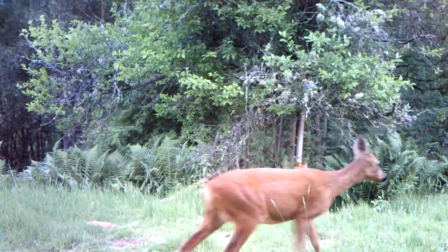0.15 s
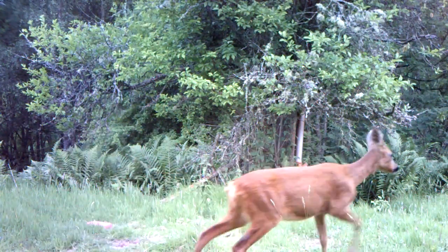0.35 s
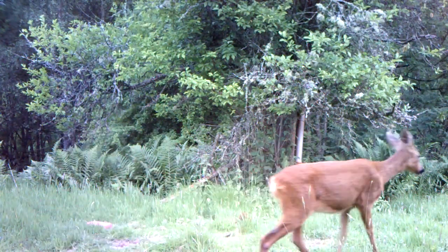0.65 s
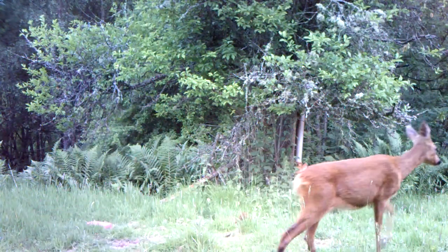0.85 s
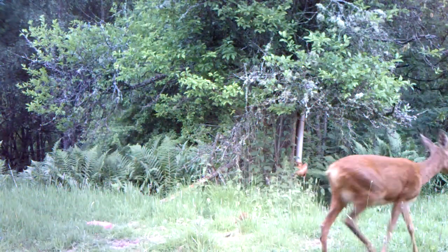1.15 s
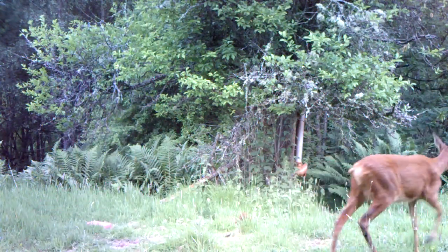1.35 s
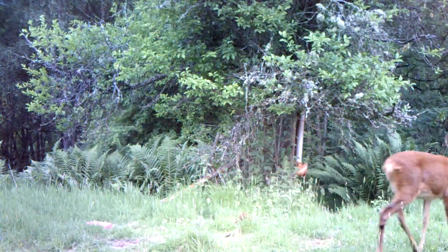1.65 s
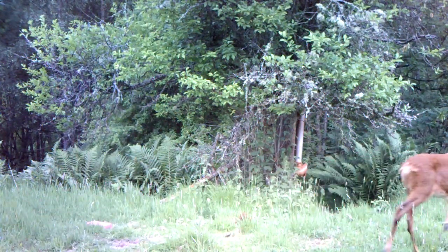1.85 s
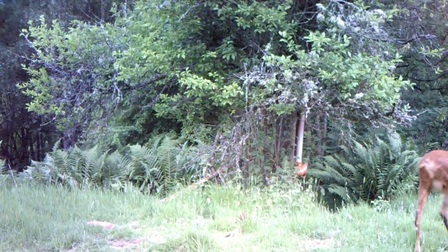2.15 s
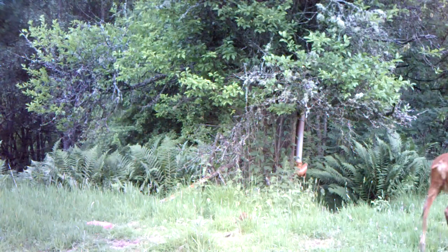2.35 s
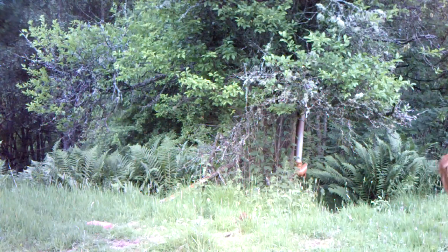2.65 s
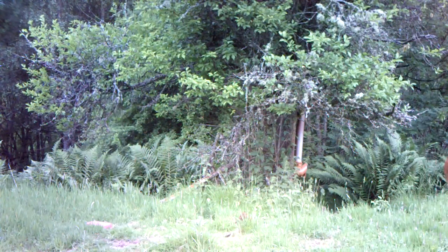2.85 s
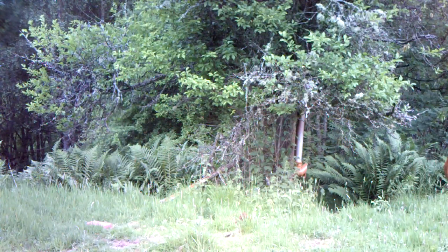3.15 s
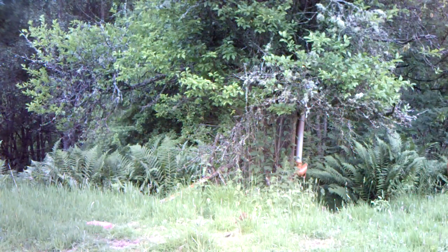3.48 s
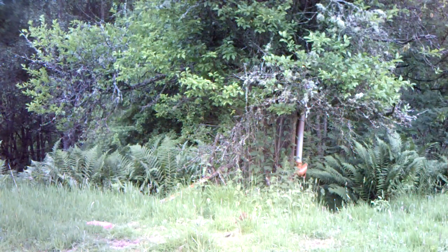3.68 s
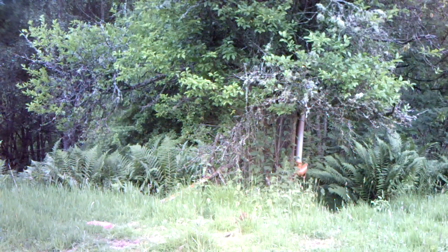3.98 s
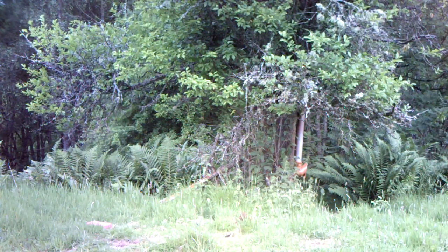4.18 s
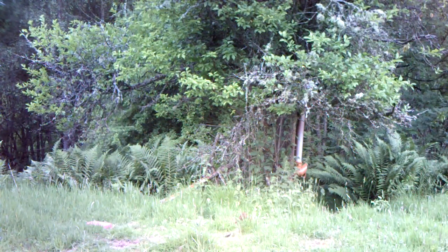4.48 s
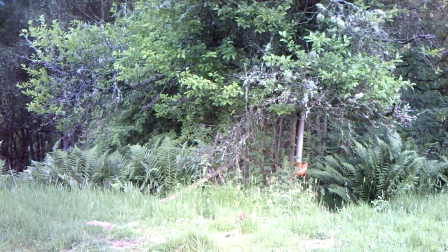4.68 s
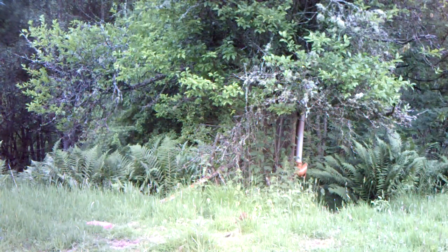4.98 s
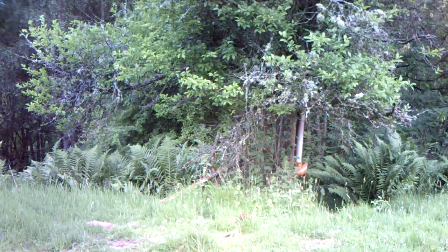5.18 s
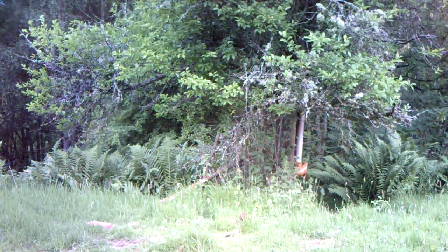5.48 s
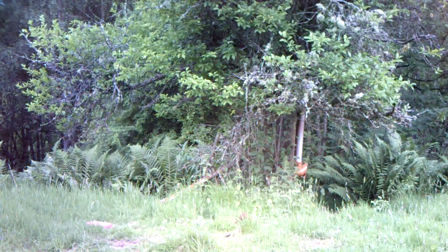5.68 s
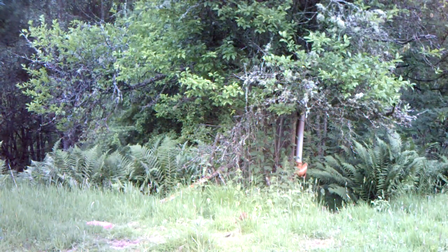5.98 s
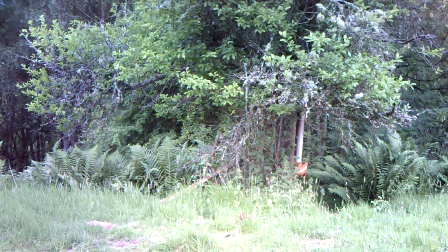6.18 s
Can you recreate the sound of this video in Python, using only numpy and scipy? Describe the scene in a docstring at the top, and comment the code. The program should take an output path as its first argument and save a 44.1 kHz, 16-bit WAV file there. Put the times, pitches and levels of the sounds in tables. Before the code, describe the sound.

In a quiet wood, the last ring of an earlier call fades into a far murmur and soft hiss. A deer steps faintly through grass, with a few twigs ticking and a thin bird whistling far away. Near the end it huffs and barks once, loud and hoarse, fairly close to the microphone. The bark rings briefly among the trees with a slight echo, followed by a faint creaky grunt.

```python
"""Roe deer barking in woodland at dusk

One microphone in a quiet wood. A deer walks through the grass, twigs ticking, over a far murmur,
soft hiss and a thin distant bird; an earlier call is just dying away at the start. Fairly close,
it huffs and barks once, hoarsely, ragged vocal-fold pulses ringing its throat, then gives a faint
creaky grunt. The trunks scatter the bark and ring on, and the clearing's far edge sends an echo."""
import sys
import numpy as np
from scipy import signal
from scipy.io import wavfile
from scipy.ndimage import uniform_filter1d

SR = 44100
rng = np.random.default_rng(int(sys.argv[2]) if len(sys.argv) > 2 else 0)


def inscribe(sig):
    """Save sig as 16-bit PCM at rate SR to the path in sys.argv[1].

    A 1-D sig is mono; a 2-D sig holds one channel per row.
    Samples are clipped to [-1, 1] before scaling.
    """
    pcm = np.round(np.clip(np.atleast_2d(sig).T, -1, 1) * 32767)
    wavfile.write(sys.argv[1], SR, pcm.astype(np.int16))


N = 279099
TIME = np.arange(N) / SR

# spectrum of the wood's background: frequency_hz, gain_db
AIR_COLOUR = [(25, -7.5), (110, -8.5), (260, -12), (400, -7.5), (600, -4), (850, -1.5), (1100, 0.5),
              (1400, -7.5), (1750, -16.5), (2300, -19.5), (3500, -21), (7000, -21), (9500, -23.5),
              (12000, -25.5)]
# spectrum of an earlier call's last ring: frequency_hz, gain_db
EARLIER_COLOUR = [(200, -32), (600, 3.5), (1000, 4), (1400, 7), (2000, -3), (3200, -10.5), (5000, -24),
                  (12000, -47)]
# the deer's strides through the grass, about two a second: peak_s, level_db
STRIDES = [(.07, -69.5), (.35, -69), (.74, -74), (1.22, -71), (1.72, -73), (2.19, -73), (2.73, -72),
           (3.66, -74.5), (4.24, -76), (4.7, -74), (5.0, -73), (5.33, -72), (5.76, -70.5), (6.17, -70.5)]
# spectrum of brushing blades: frequency_hz, gain_db
GRASS_COLOUR = [(500, -11), (2500, -9), (5000, 1.5), (7500, 5), (10500, 2), (13000, -25)]
# twigs and dry stems snapping, level over the first 2 ms: start_s, level_db, low_hz, high_hz
TWIG_SNAPS = [(0.141, -61, 2500, 10000), (0.715, -51.5, 2800, 11100), (1.753, -53.5, 2900, 10000),
              (2.017, -62, 4500, 10000), (2.7138, -50.5, 5900, 12000), (2.731, -57, 6200, 11000),
              (2.798, -65.5, 1970, 2880), (3.089, -65, 2300, 4000), (4.248, -62, 6000, 11000)]
# the bird's notes before the trees scatter them: start_s, length_s, pitch_hz, level_db
BIRD_NOTES = [(1.628, 0.19, 4330, -81), (1.864, 0.099, 4344, -72.5), (2.207, 0.091, 4390, -80),
              (4.125, 0.12, 4430, -74), (4.375, 0.12, 4400, -76)]
# spectrum of the wood's ring: frequency_hz, gain_db
WOOD_COLOUR = [(150, -18), (400, -4), (600, 2), (900, 0), (1400, -2.5), (2000, 1.5), (4000, 10.5),
               (9000, -18)]
# time that ring takes to fall 60 dB: frequency_hz, decay_s
WOOD_T60 = [(150, 0.55), (600, 0.77), (1300, 0.79), (2000, 0.85), (4000, 0.59), (9000, .4)]
# spectrum of the breath that opens the bark: frequency_hz, gain_db
HUFF_COLOUR = [(90, -19), (180, -6), (260, 11.5), (370, 7.5), (600, -4), (1200, -2), (2500, -35),
               (4200, -15), (6000, -27), (7400, -9), (9000, -28), (12000, -43)]
# spectrum of turbulence at the mouth: frequency_hz, gain_db
MOUTH_HISS_COLOUR = [(1500, -22), (3000, 2), (3900, -3.5), (4600, 2), (5800, -11.5), (7300, -5.5),
                     (9000, -19), (12000, -27)]
# broad spectrum of the voice: frequency_hz, gain_db
VOICE_COLOUR = [(110, -64), (210, -19.5), (310, -16.5), (420, -19), (540, -6), (780, -7), (1100, 1.4),
                (1550, -2.5), (2200, -13.5), (3300, -19), (3900, -38), (5500, -37.5), (8000, -44),
                (12000, -67)]
# throat resonances before the mouth shifts them: centre_hz, width_hz, lift_db
THROAT_RESONANCES = [(590, 155, 7.5), (1290, 65, 13), (1930, 29, 13.5), (3310, 140, 4), (4500, 280, -7)]
# hard slaps of the vocal folds within the bark: start_s, peak_db
FOLD_SLAPS = [(5.4882, -20.5), (5.5185, -18), (5.535, -19), (5.5491, -19.5), (5.5604, -20.5), (5.5838, -18),
              (5.6077, -20)]
# spectrum of the grunt: frequency_hz, gain_db
GRUNT_COLOUR = [(100, -21), (300, -11), (700, -20), (1100, -15), (1400, -1.5), (1650, -9), (2050, -28),
                (5000, -37)]


def amp(db):
    return 10 ** (np.asarray(db) / 20)


def unit_rms(x):
    return x / np.sqrt(np.mean(x ** 2) + 1e-20)


def value_at(points, hz):
    """A table's value at hz, interpolated on a log-frequency axis."""
    table_hz, values = np.transpose(points)
    return np.interp(np.log(hz + 1), np.log(table_hz + 1), values)


def add(mix, start_s, sound):
    part = mix[round(start_s * SR):][:len(sound)]
    part += sound[:len(part)]


def wander(t, per_s):
    """A random drift of about unit size, with per_s turning points a second."""
    knots = rng.standard_normal(8192)
    return np.interp((t - t[0]) * per_s, np.arange(len(knots)), knots)


def envelope(t, attack_s, hold_s, release_s, depth_db=40):
    """A rounded rise from depth_db down, a hold, and a rounded fall."""
    rising = np.maximum(1 - t / attack_s, 0)
    falling = np.maximum(t - attack_s - hold_s, 0) / release_s
    return amp(-depth_db * (rising ** 1.45 + falling ** 2))


def colour(x, points):
    """A causal filter with the given spectrum: it rings after a pulse, never before."""
    log_gain = np.log(amp(value_at(points, abs(np.fft.fftfreq(8192, 1 / SR)))))
    taps = np.fft.ifft(np.exp(np.conj(signal.hilbert(log_gain)))).real
    return signal.fftconvolve(x, taps[:len(taps) // 2])[:len(x)]


def resonate(x, hz, width_hz):
    """A resonance of gain 1 centred on hz, which may glide."""
    turn = np.exp(2j * np.pi * np.cumsum(hz * np.ones(len(x))) / SR)
    pole = np.exp(-np.pi * width_hz / SR)
    return 2 * (turn * signal.lfilter([1 - pole], [1, -pole], x / turn)).real


def air(level_db=-60.5, swell_db=0.42, murmur_below_hz=1800):
    """A far murmur that swells a little, under steady hiss."""
    noise = amp(level_db) * unit_rms(colour(rng.standard_normal(N), AIR_COLOUR))
    murmur = signal.sosfiltfilt(signal.butter(2, murmur_below_hz, fs=SR, output="sos"), noise)
    return noise + murmur * (amp(-swell_db * wander(TIME, 5.05)) - 1)


def earlier_ring(level_db=-58, t60_s=2.1):
    """The diffuse end of an earlier call, fading among the trees."""
    return unit_rms(colour(rng.standard_normal(N), EARLIER_COLOUR)) * amp(level_db - 60 * TIME / t60_s)


def grass(clicks_per_s=1500, spread_db=3, clump_db=2, rise_s=0.086, fall_s=0.1):
    """At each stride, blades flick past each other as many small clicks, in uneven clumps."""
    clicks = rng.standard_normal(N) * (rng.random(N) < clicks_per_s / SR)
    clicks *= amp(spread_db * np.minimum(rng.exponential(1, N), 3))
    swish = sum(amp(level_db) * np.exp(-np.maximum((peak_s - TIME) / rise_s, (TIME - peak_s) / fall_s))
                for peak_s, level_db in STRIDES)
    return unit_rms(colour(clicks, GRASS_COLOUR)) * swish * amp(clump_db * wander(TIME, 25))


def twigs(stem_hz=2800, stem_decay_s=.0018):
    """Each break is a crack and a burst of milliseconds; thick stems sound duller and longer."""
    out, t = np.zeros(N), TIME[:2048]
    for start_s, level_db, low_hz, high_hz in TWIG_SNAPS:
        decay_s = stem_decay_s * (stem_hz / low_hz) ** 2  # grows with the square of the wavelength
        burst = rng.standard_normal(len(t)) * np.exp(-t / decay_s)
        burst[0] = 2  # the crack
        burst = signal.sosfilt(signal.butter(2, [low_hz, high_hz], "band", fs=SR, output="sos"), burst)
        add(out, start_s, amp(level_db) * burst / burst[t < .002].std())
    return out


def near_trees(x, level_db, echoes_per_s=900, t60_s=.13):
    """The ground and trunks near the microphone return sparse, quickly fading echoes."""
    t = TIME[:SR // 3]
    echoes = rng.choice([-1., 1.], len(t)) * (rng.random(len(t)) < echoes_per_s / SR)
    echoes *= (t > .002) * amp(-60 * t / t60_s)
    return amp(level_db) * signal.fftconvolve(x, echoes / np.linalg.norm(echoes))[:N]


def bird(slur_hz_per_s=700):
    """Thin, quavering whistles from far off, each slurred slightly downwards."""
    out = np.zeros(N)
    for start_s, length_s, pitch_hz, level_db in BIRD_NOTES:
        t = TIME[:round(length_s * SR)]
        quaver = 1 + .019 * wander(t, 150)
        hz = pitch_hz * quaver - slur_hz_per_s * (t - length_s / 2)
        whistle = np.sin(2 * np.pi * np.cumsum(hz) / SR) * signal.windows.tukey(len(t), .6)
        add(out, start_s, amp(level_db) * unit_rms(whistle))
    return out


def deep_wood(x, level_db, build_s=0.021):
    """Countless far trunks blur the sound into a tail that lasts longest in the middle range."""
    hz, t, spectrum = signal.stft(rng.standard_normal(3 * SR // 2), SR, nperseg=256)
    spectrum *= amp(-60 * t / value_at(WOOD_T60, hz)[:, None]) * (1 - np.exp(-t / build_s))
    spectrum *= amp(value_at(WOOD_COLOUR, hz))[:, None]
    tail = signal.istft(spectrum, SR, nperseg=256)[1]
    return amp(level_db) * signal.fftconvolve(x, tail / np.linalg.norm(tail))[:N]


def huff(start_s=5.429, level_db=-52, catch_s=5.468, catch_db=-48):
    """Air flows through the deer's open throat ahead of the voice, and spits as the folds catch."""
    out, t = np.zeros(N), TIME[:SR // 6]
    flow, spit = rng.standard_normal((2, len(t)))
    flow = amp(level_db) * unit_rms(colour(flow, HUFF_COLOUR))
    spit = amp(catch_db) * unit_rms(colour(spit, MOUTH_HISS_COLOUR))
    add(out, start_s, flow * envelope(t, attack_s=0.025, hold_s=0.031, release_s=.04))
    add(out, catch_s, spit * envelope(t, attack_s=0.0047, hold_s=0.0031, release_s=0.021))
    return out


def vocal_folds(t, pitch_hz, jitter, shimmer_db, roughness):
    """One click a cycle, uneven in time and strength, each followed by a puff of turbulence."""
    noise, strengths = rng.standard_normal((2, N))
    turns = np.cumsum(pitch_hz * (1 + jitter * wander(t, 200))) / SR
    cycle = turns.astype(int)
    clicks = np.diff(cycle, prepend=0)
    puffs = (.5 + np.exp(-(turns % 1) / .5)) * noise[:len(t)]
    pulses = (1 - roughness) * unit_rms(clicks) + roughness * unit_rms(puffs)
    return pulses * amp(shimmer_db * np.tanh(strengths[cycle]))


def throat(x, open_ratio=1.18, shut_ratio=.93, closing_s=0.0884):
    """The throat's resonances sink as the mouth closes, quickly at first."""
    mouth = shut_ratio + (open_ratio - shut_ratio) * np.exp(-TIME[:len(x)] / closing_s)
    for centre_hz, width_hz, lift_db in THROAT_RESONANCES:
        x = x + (amp(lift_db) - 1) * resonate(x, centre_hz * mouth, width_hz)
    return colour(x, VOICE_COLOUR)


def mouth_hiss(t, relative_db=-23, fade_db_per_s=12, flutter_db=3.1):
    """Turbulence at the mouth: a fluttering hiss that fades under the rasp."""
    turbulence = rng.standard_normal(len(t)) * amp(flutter_db * wander(t, 310.5))
    return amp(relative_db - fade_db_per_s * t) * unit_rms(colour(turbulence, MOUTH_HISS_COLOUR))


def chest_tone(t, pitch_hz, level_db=-56, octave_db=-5):
    """The soft tone of the folds under the rasp: the fundamental and its octave."""
    phase = 2 * np.pi * np.cumsum(pitch_hz) / SR
    tone = unit_rms(np.sin(phase)) + amp(octave_db) * unit_rms(np.sin(2 * phase))
    return tone * amp(level_db) * envelope(t, attack_s=0.023, hold_s=.15, release_s=.075)


def bark(start_s=5.436, level_db=-34, overshoot_db=7.5, settle_s=0.042, stall_s=0.0014):
    """One push of the lungs drives ragged fold pulses and a few hard slaps through the throat."""
    attack_s, hold_s, release_s = .084, 0.099, 0.084
    out, t = np.zeros(N), TIME[:round((attack_s + hold_s + release_s) * SR)]
    settling = np.exp(-np.maximum(t - attack_s, 0) / settle_s)
    effort = envelope(t, attack_s, hold_s, release_s) * amp(level_db + overshoot_db * settling)
    pitch_hz = 166.3 - 2000 * np.maximum(t - .12, 0) ** 2  # level, then dropping as the folds slacken
    roughness = 0.7 - 1.74 * t  # the rasp clears as the pressure drops
    rasp = throat(vocal_folds(t, pitch_hz, jitter=.1, shimmer_db=2.5, roughness=roughness))
    # lung pressure holds the power over a few cycles
    rasp /= np.sqrt(uniform_filter1d(rasp ** 2, size=900) + 1e-12)
    slaps = np.zeros(len(t))
    for slap_s, peak_db in FOLD_SLAPS:
        add(slaps, slap_s - start_s, [amp(peak_db)])
        rasp *= 1 - 0.66 * np.exp(-((start_s + t - slap_s) / stall_s) ** 2)  # the folds stall briefly
    ring_peak = abs(throat(signal.unit_impulse(len(t), "mid"))).max()
    slaps = throat(slaps) / ring_peak
    add(out, start_s, (rasp + mouth_hiss(t)) * effort + slaps + chest_tone(t, pitch_hz))
    return out


def far_edge(x, delay_s=.165, level_db=-19, centre_hz=610, width_hz=320):
    """The far edge of the clearing sends one hollow echo back to the microphone."""
    out = np.zeros(N)
    hollow = resonate(resonate(x, centre_hz, width_hz), centre_hz, width_hz)
    add(out, delay_s, amp(level_db) * hollow)
    return out


def grunt(start_s=6.005, length_s=.07, from_hz=138, to_hz=75, level_db=-56.5):
    """After the bark, the slack folds flap a few more times, slowing down."""
    out, t = np.zeros(N), TIME[:round(length_s * SR)]
    pitch_hz = np.linspace(from_hz, to_hz, len(t))
    pulses = vocal_folds(t, pitch_hz, jitter=.04, shimmer_db=1.5, roughness=.12)
    creak = unit_rms(colour(pulses, GRUNT_COLOUR))
    add(out, start_s, creak * amp(level_db) * np.sin(np.pi * t / length_s))
    return out


def scene():
    """The deer is fairly close to the microphone; the bird reaches it only by way of the trees."""
    call = huff() + bark() + grunt()
    deer = call + near_trees(call, level_db=-12) + deep_wood(call, level_db=-18) + far_edge(call)
    whistles = bird()
    far_bird = near_trees(whistles, level_db=-6) + deep_wood(whistles, level_db=-8)
    snaps = twigs()
    snaps = snaps + near_trees(snaps, level_db=-8)
    return (deer + far_bird + earlier_ring() + snaps + grass() + air())[None]


def record(dry):
    """The mono recorder takes in nothing above its band limit."""
    limit_hz = 12200
    lowpass = signal.firwin(401, limit_hz, window=("kaiser", 7), fs=SR)
    return signal.oaconvolve(dry, lowpass[None], "same")


dry = scene()
out = record(dry)
inscribe(out)
```